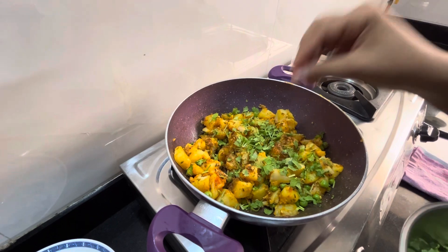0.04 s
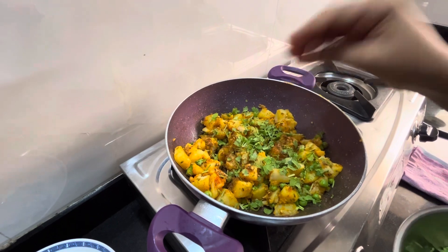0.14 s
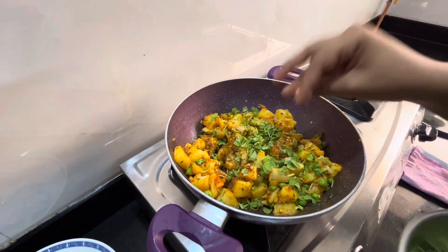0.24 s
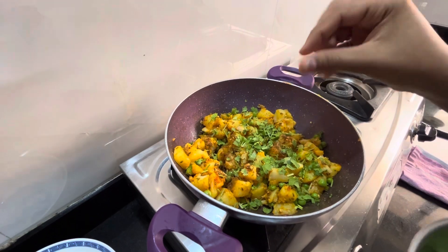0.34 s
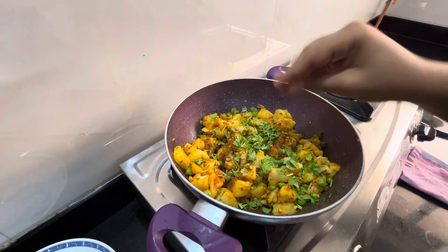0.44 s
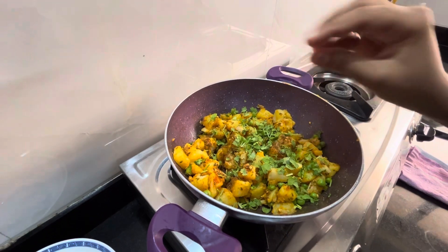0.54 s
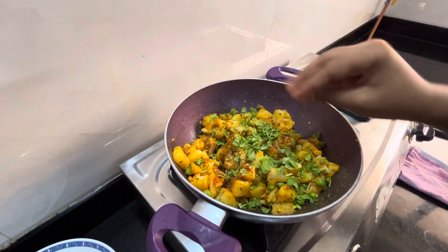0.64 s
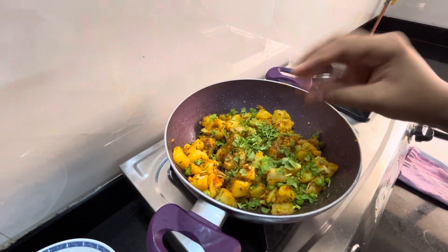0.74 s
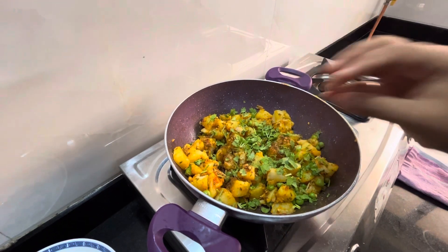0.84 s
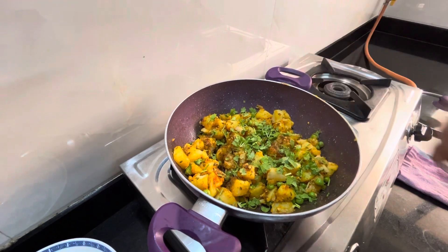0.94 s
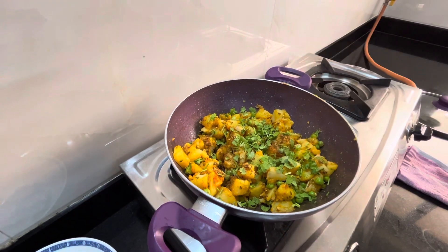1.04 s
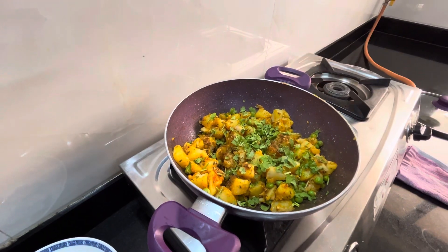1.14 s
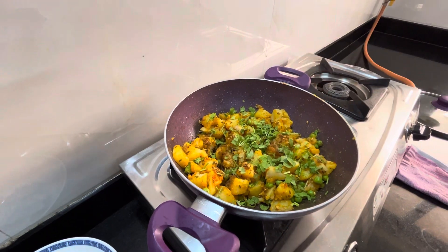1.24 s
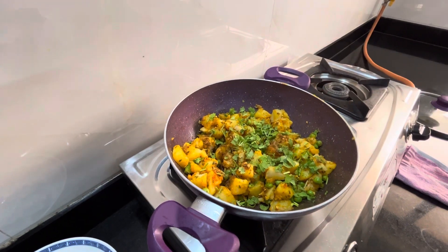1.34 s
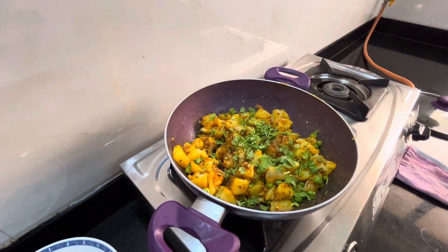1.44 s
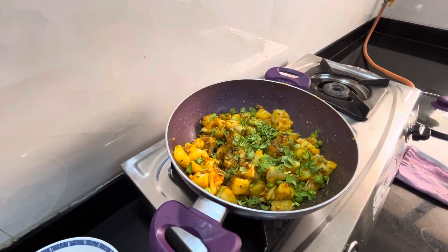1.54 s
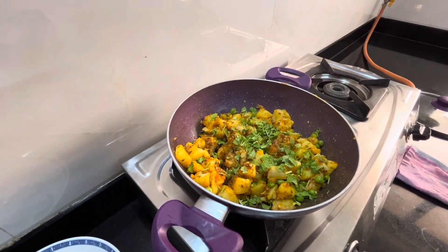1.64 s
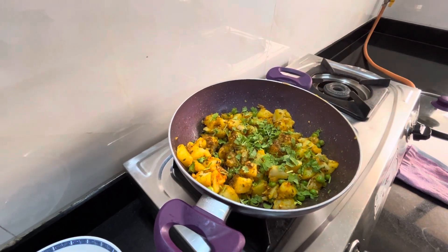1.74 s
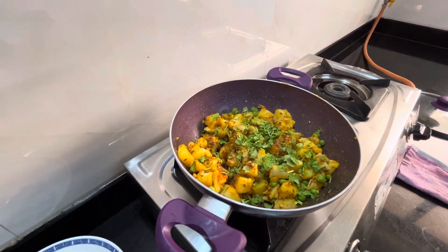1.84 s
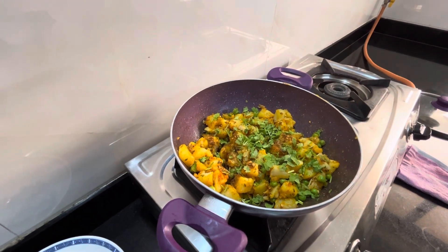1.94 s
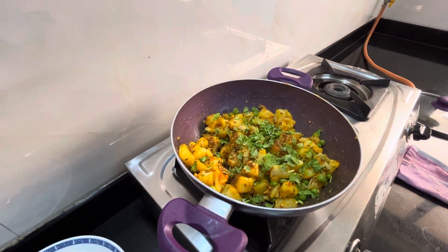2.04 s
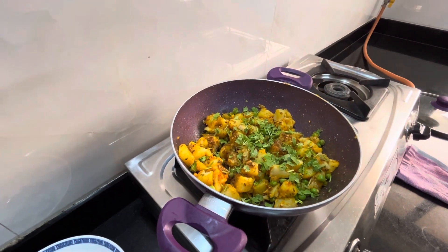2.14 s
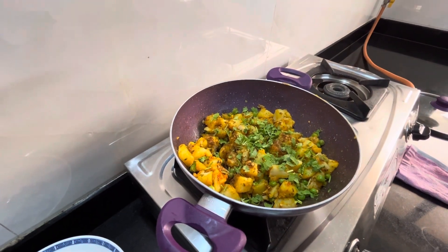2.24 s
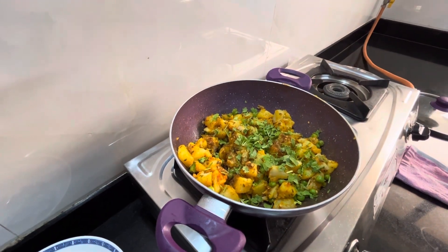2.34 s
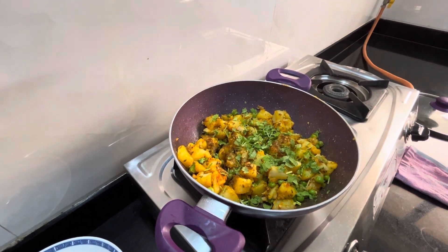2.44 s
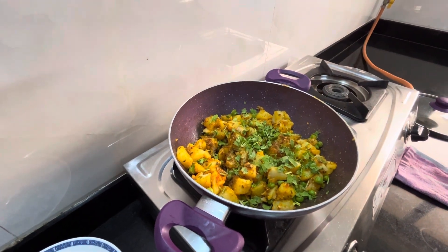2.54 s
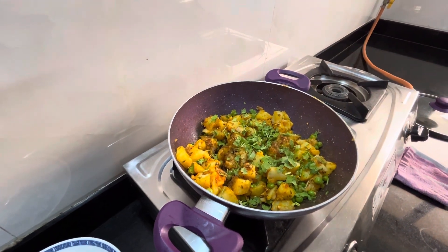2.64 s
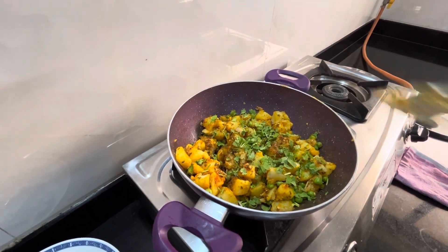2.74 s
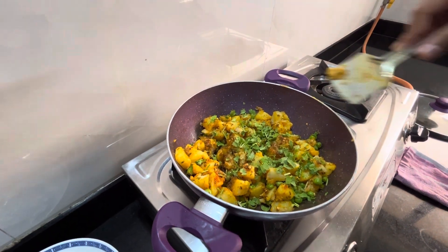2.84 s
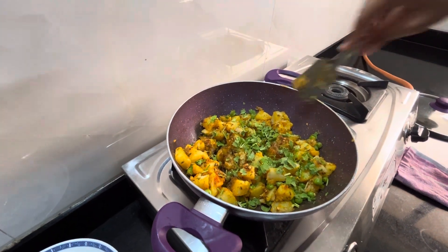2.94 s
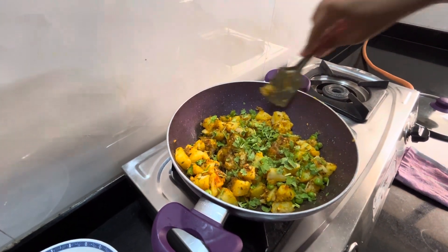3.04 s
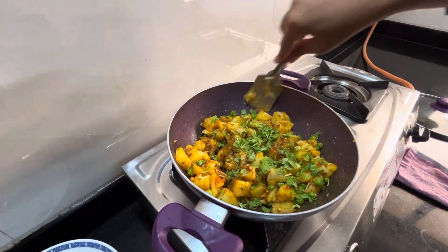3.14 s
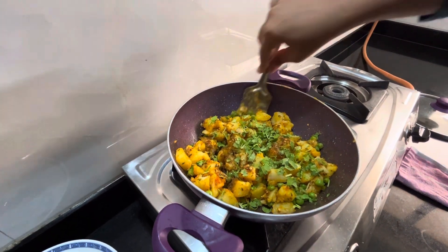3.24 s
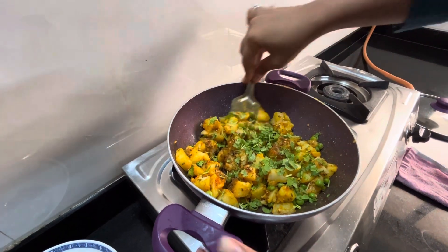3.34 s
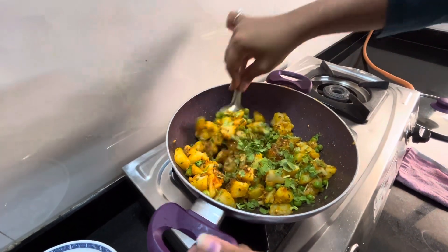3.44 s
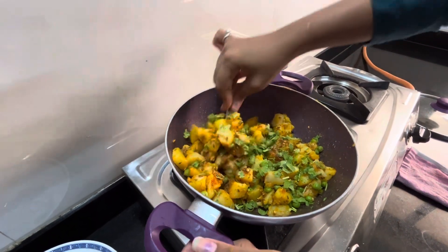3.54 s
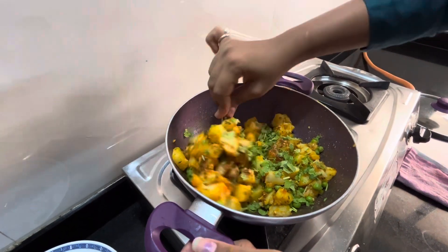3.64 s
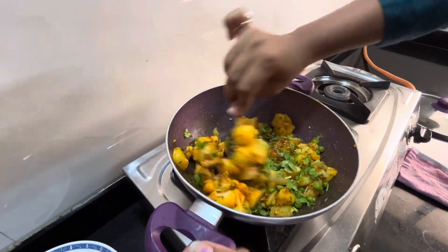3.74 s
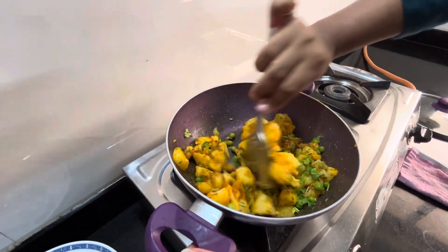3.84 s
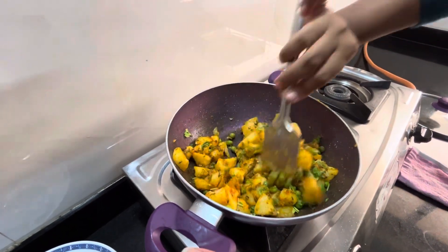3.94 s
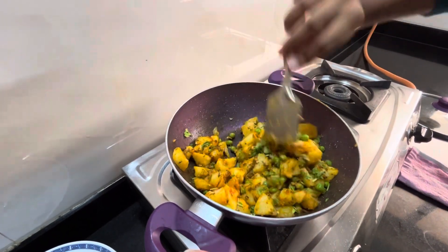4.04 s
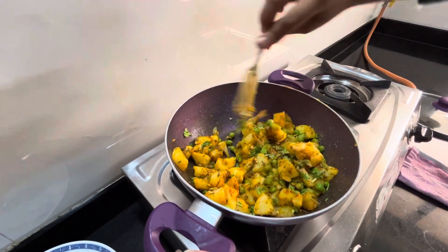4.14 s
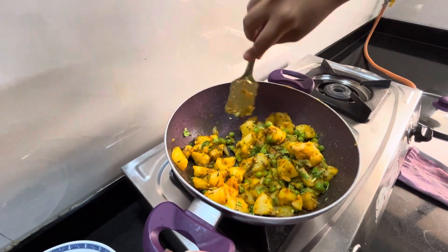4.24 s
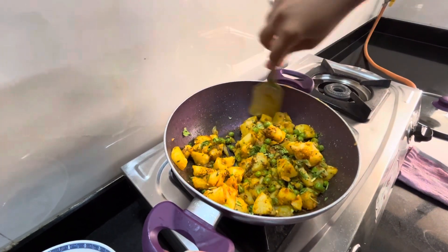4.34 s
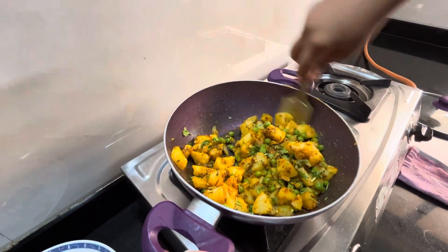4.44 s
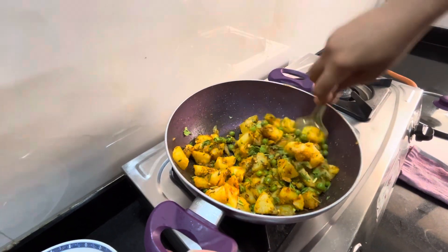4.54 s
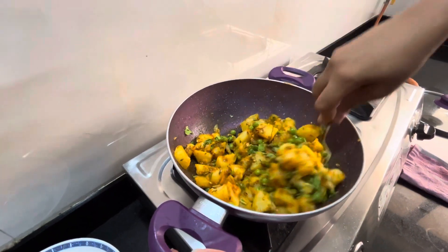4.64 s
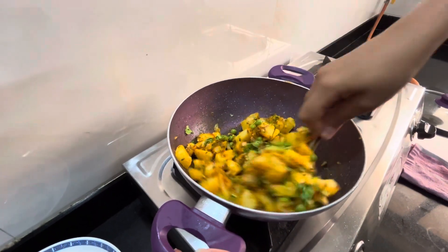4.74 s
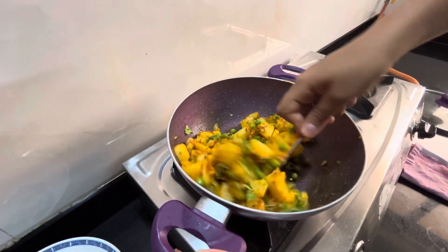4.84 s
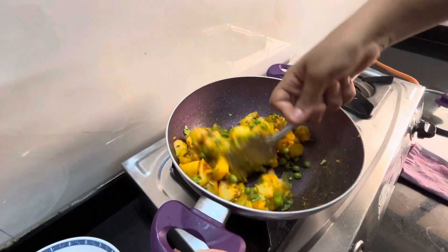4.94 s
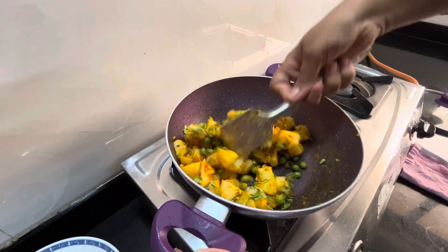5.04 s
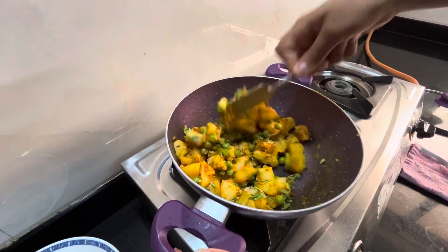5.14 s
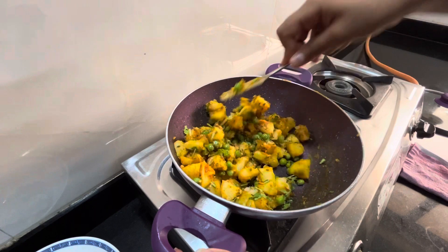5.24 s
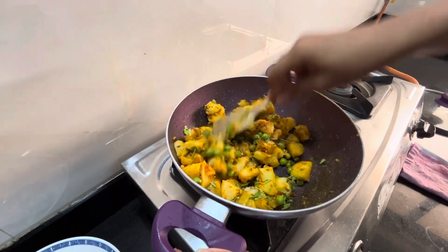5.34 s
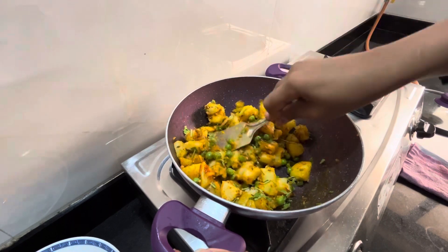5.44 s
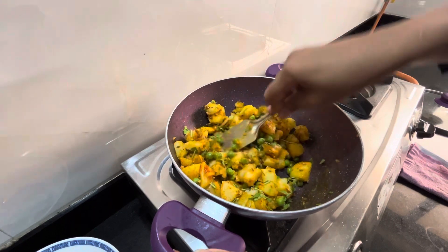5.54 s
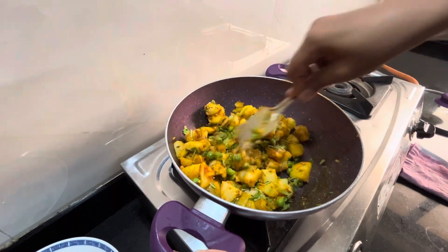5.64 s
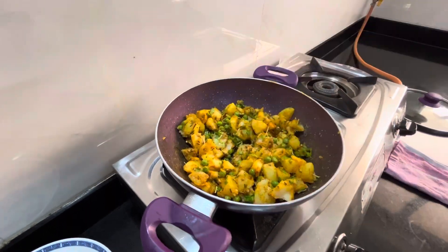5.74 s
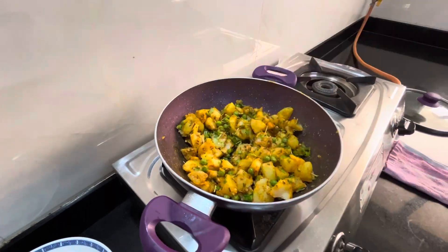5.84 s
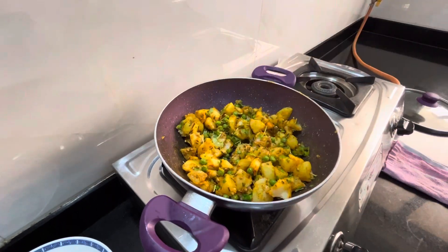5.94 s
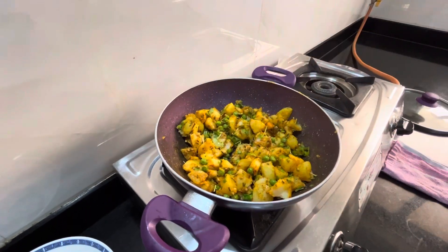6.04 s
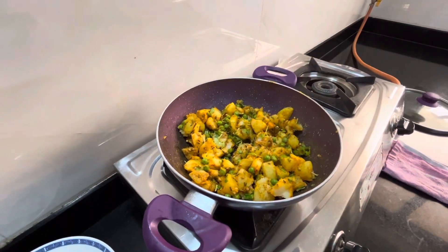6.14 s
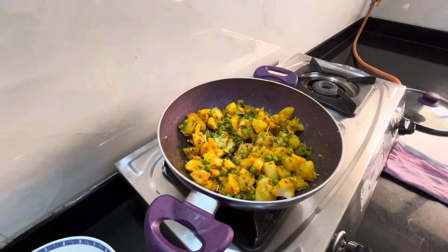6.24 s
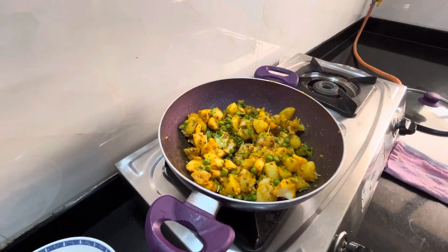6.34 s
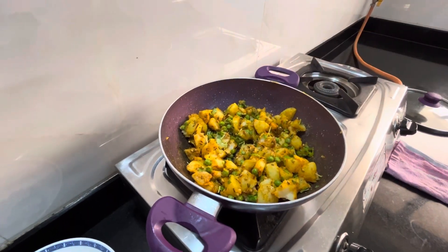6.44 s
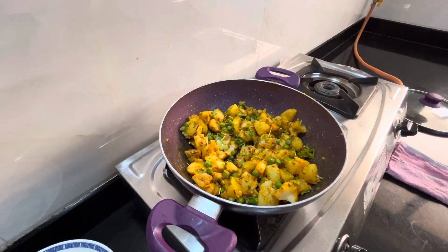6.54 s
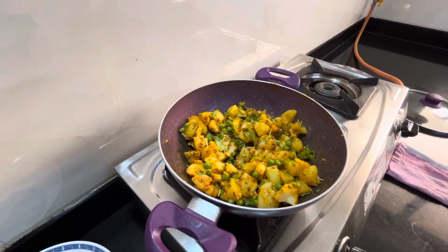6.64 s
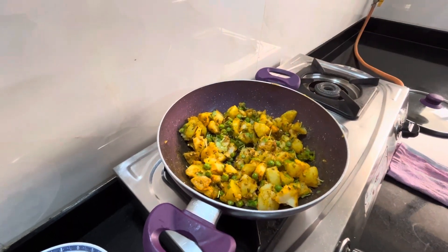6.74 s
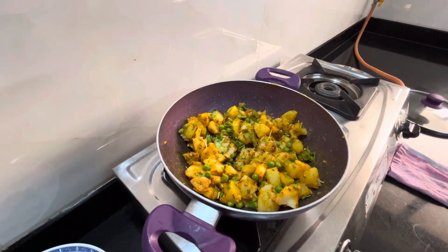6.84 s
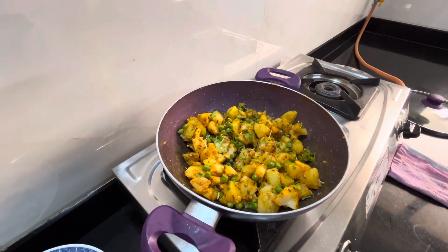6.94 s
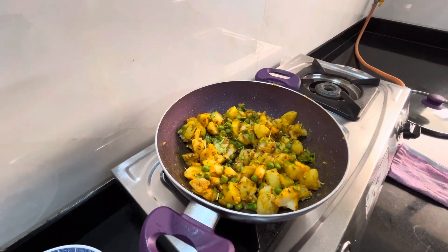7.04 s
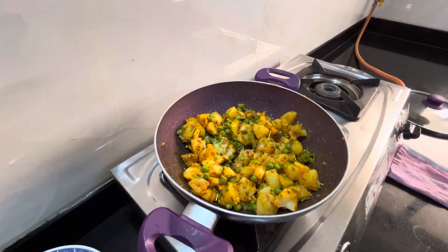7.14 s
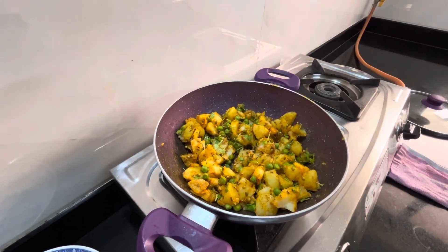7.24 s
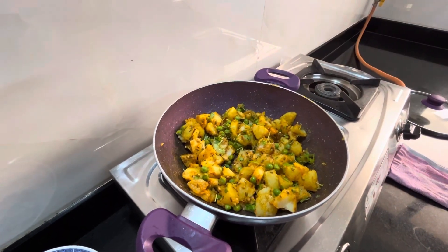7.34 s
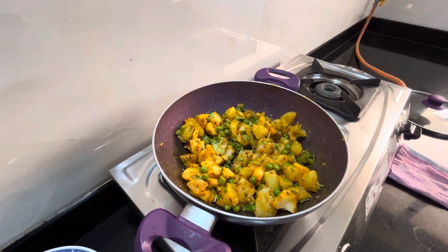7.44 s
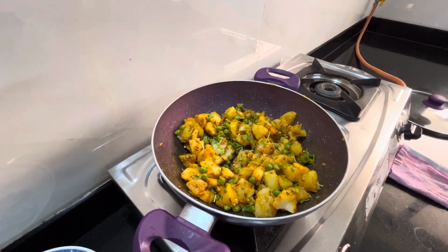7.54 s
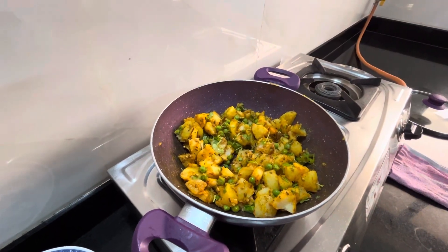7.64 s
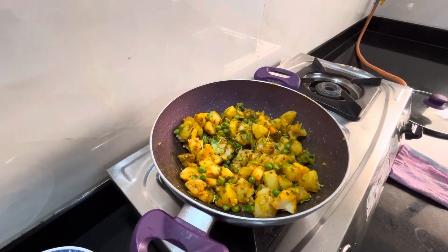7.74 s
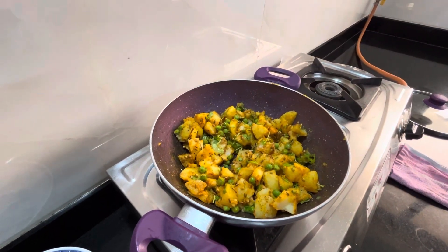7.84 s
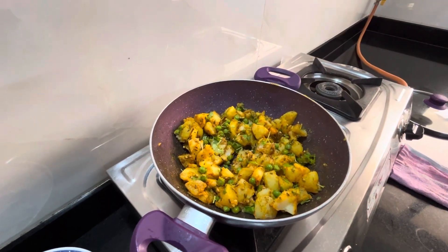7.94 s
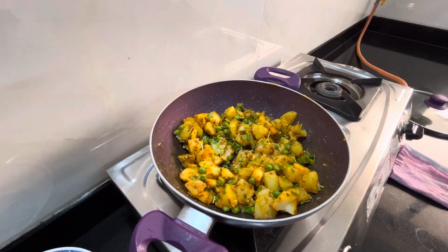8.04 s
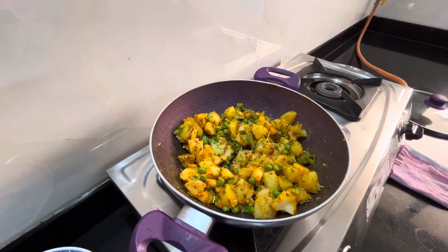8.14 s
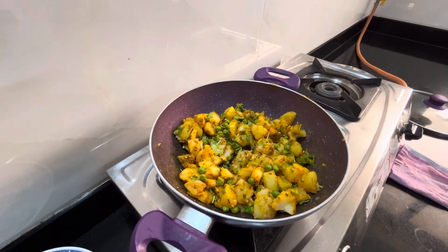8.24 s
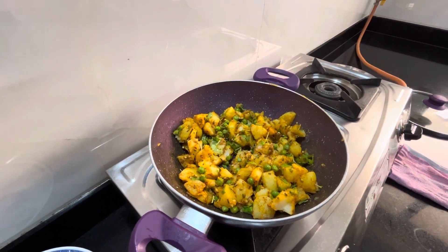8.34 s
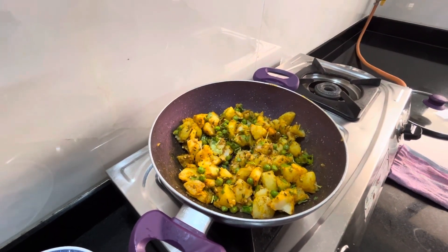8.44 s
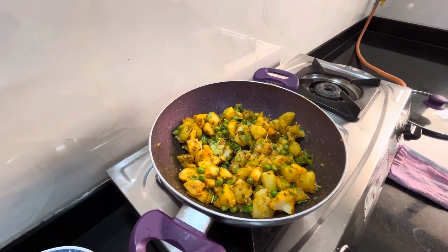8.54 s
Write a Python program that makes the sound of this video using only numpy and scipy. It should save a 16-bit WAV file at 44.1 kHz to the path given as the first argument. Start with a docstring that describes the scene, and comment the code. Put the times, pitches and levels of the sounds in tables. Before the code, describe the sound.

A small, hard, lively kitchen heard closely in stereo: a low steady room drone, faint wavering hum and a soft crackling sizzle that slowly fades throughout. The first second is only this background. A faint knock comes at 1.3 s, light utensil rubs at 1.65 and 1.95, then a cluster of dull thuds and short damped dish clinks from 2.15 to 2.65 with low handling rumble. At 2.95 a hard spatula tap hits the pan, followed by gritty scrapes and wet squelches until about 3.5. A lull, then another sharp tap at 4.3, with scraping, squeaky rubs and squelching to 4.75, and heavy dull knocks around 4.9-5.2. A tiny tick at 5.7 and small handling clicks at 6.3 precede the loudest event: at 6.74 a bright steel clank, rapidly bouncing, ringing for about half a second. The background ducks, then returns, with faint rumble and soft bumps at 7.6-7.9.

```python
"""Small hard-walled kitchen: a steel spatula turns cooked potato filling in a nonstick pan on a gas stove.
Knocks are noise bursts through resonances; taps, clinks and the put-down clank add decaying modes.
Scrapes are random slips exciting the pan's modes, squelches are crowds of bursting wet films.
Shaped noise gives a low drone, hum, slowly fading sizzle and spells of rumble; gain ducks under loud blows."""
import sys
import numpy as np
from scipy import signal
from scipy.fft import rfft, irfft, next_fast_len
from scipy.io import wavfile
from scipy.ndimage import uniform_filter1d, minimum_filter1d

SR = 44100
rng = np.random.default_rng(int(sys.argv[2]) if len(sys.argv) > 2 else 0)


def unload_wav(signal):
    """Save mono or channel-first audio to the path in sys.argv[1] as 16-bit WAV at rate SR, clipped to [-1, 1]."""
    wavfile.write(
        sys.argv[1],
        SR,
        np.round(np.clip(np.atleast_2d(signal).T, -1, 1) * 32767).astype(np.int16),
    )


N = 378267
TIME_S = np.arange(N) / SR
RING_S = TIME_S[:SR]  # one second, time since a blow
TOP_HZ = 15800

# Levels are relative: each source adds its own gain, room and ducking.
# Kitchen decay: (frequency [Hz], t60 [s])
ROOM_DECAY = [(150, 0.79), (500, 0.61), (1500, 0.51), (4000, 0.5), (8000, 0.52), (14000, 0.16)]
# Room drone spectrum: (frequency [Hz], level [dB])
DRONE_SPECTRUM = [(20, -31), (28, -34), (39, -23), (50, -0.5), (62, -18.5), (85, 2), (108, 1.5),
                  (155, -7.5), (225, -11), (300, -11.5), (400, -7.5), (480, -26), (1000, -24),
                  (1800, -40.5)]
# Sizzle spectrum: (frequency [Hz], level [dB])
SIZZLE_SPECTRUM = [(80, 3), (350, -1.5), (600, -3), (1180, -2), (1740, -6), (2280, -7), (2540, -9),
                   (3600, -5.5), (6690, -12), (7860, -15.5), (10400, -8.5), (13300, -18.5), (14200, -7),
                   (15000, -59)]
# Hum bands: (centre [Hz], level [dB], filter width [Hz])
HUM_BANDS = [(103.6, -87, 17), (378.5, -59.5, 4.4), (425, -68.5, 5.7)]
# Dull knocks of dishes, pan and food:
# (time [s], level [dB], body pitch [Hz], body filter width [Hz], tick [dB], left minus right [dB])
KNOCK_EVENTS = [(1.311, -21.5, 330, 567, -13, 5), (2.154, -9.5, 547, 407, -11.5, -5),
                (2.156, -6, 828, 150, -8, 6), (2.205, -16, 890, 298, -30, 6),
                (2.371, -14.5, 510, 610, -5.5, -1), (2.479, -16, 925, 810, -4.5, 7),
                (2.49, -11, 470, 702, -14, -3), (2.496, -11.5, 105, 68.6, -32, 1),
                (2.633, -13.5, 88, 39, -13, 2), (2.972, -3, 489, 700, -33, 0),
                (3.039, -8.5, 328, 500, -30, -1), (3.159, -16, 194, 70, -28.5, 0),
                (3.587, -15.5, 850, 140, -30, 4), (4.289, -11, 370, 584, -29.5, -3),
                (4.913, -11.5, 910, 268, -42, 0.5), (4.9905, -17.5, 1070, 1130, -28, 0),
                (4.993, -4.5, 315, 129, -30, -3), (5.008, -7.5, 580, 317, -25, 7.5),
                (5.194, -16, 134, 99, -33, 0), (6.342, -22, 1000, 1800, -8.5, 9),
                (6.358, -15, 161, 283, -30, 5), (7.661, -30.5, 1250, 1500, -24, 7),
                (7.897, -23.5, 990, 202, -25, 2)]
# Short rubs and squeaks of utensils:
# (peak time [s], half length [s], level [dB], centre [Hz], filter width [Hz])
RUB_EVENTS = [(1.653, 0.045, -45.5, 3980, 3000), (1.658, 0.037, -47, 1870, 500),
              (1.66, 0.024, -47, 3230, 250), (1.68, 0.018, -48, 5700, 300), (1.682, 0.019, -39, 4340, 200),
              (1.67, 0.035, -54, 7450, 250), (1.679, 0.04, -51, 8800, 250), (1.933, 0.024, -45, 3080, 900),
              (1.959, 0.025, -44.5, 3020, 200), (1.961, 0.026, -46.5, 5730, 4000),
              (1.958, 0.015, -46, 2430, 199), (2.462, 0.074, -43, 9500, 3000),
              (3.438, 0.025, -45, 1250, 202), (3.515, 0.032, -42, 4380, 400), (3.47, 0.017, -38, 1560, 298),
              (3.503, 0.045, -40, 1620, 300), (4.421, 0.05, -41, 3000, 350), (4.56, 0.06, -37, 3580, 250),
              (4.562, 0.07, -38, 1430, 300), (4.58, 0.016, -36, 850, 111), (4.623, 0.1, -39.5, 2800, 250),
              (4.658, 0.059, -37, 1680, 220), (4.636, 0.021, -39, 3300, 2200),
              (4.754, 0.049, -44, 2730, 220), (4.75, 0.05, -43.5, 1640, 400),
              (6.292, 0.018, -50.5, 4400, 1600), (6.312, 0.016, -50, 9000, 4000),
              (6.365, 0.025, -42, 1300, 1600), (6.37, 0.047, -51, 3750, 400)]
# Low rumble while things are handled: (hold start [s], hold [s], level [dB], deep boom [dB])
RUMBLE_SPELLS = [(2.15, 0.67, -49, -75), (3.233, 1.86, -52.5, -72), (6.095, 0.059, -53, -75),
                 (7.554, 0.43, -49.5, -55.5)]
# Handling rumble spectrum: (frequency [Hz], level [dB])
HANDLING_SPECTRUM = [(30, -25), (70, -14), (110, 4), (150, -8.5), (400, -19.5), (1500, -43.5)]
# Clinks of a moved dish: (time [s], level [dB], most strongly struck [Hz], left minus right [dB])
CLINK_EVENTS = [(2.352, -15, 1850, 11.5), (2.365, -14, 2860, 0), (2.4788, -10.5, 1900, 5.5),
                (6.344, -22.5, 2100, 8), (6.365, -23.5, 3740, 2)]
# Modes of the hand-damped dish: (frequency [Hz], level [dB], t60 [s])
DISH_MODES = [(900, 6.5, 0.026), (1560, 2.5, 0.036), (2050, 1, .022), (2320, -18, 0.013),
              (2485, -2.5, 0.048), (3370, -12, 0.031), (3820, -6, 0.033), (5300, -6, 0.033),
              (6500, -4, .015)]
# Blade pushed along the pan: (full-force time [s], hold [s], scrape [dB], wet squelch [dB])
BLADE_PUSHES = [(2.987, 0.13, -34, -51), (3.193, 0.22, -45.5, -51), (3.451, 0.048, -31.5, -45),
                (4.317, 0.44, -44, -46), (4.523, 0.071, -33.5, -43.5), (4.64, 0.088, -38, -57),
                (4.725, 0.039, -35.5, -68)]
# Lumps of filling giving way: (peak time [s], Gaussian half length [s], squelch [dB])
LUMP_SQUASHES = [(3.043, 0.033, -32.5), (3.181, 0.018, -37.5), (3.268, 0.012, -44.5), (3.397, 0.0095, -44),
                 (4.431, 0.031, -36.5)]
# Modes of the pan loaded with food: (frequency [Hz], level [dB], t60 [s])
PAN_MODES = [(492, 6.5, 0.017), (807, 1.5, 0.051), (1115, 9.5, 0.027), (1328, 7.5, 0.019),
             (1600, 3.5, 0.04), (2350, 1.5, 0.013), (2660, -1.5, 0.045), (3060, 8, 0.014),
             (3595, 5.5, 0.012), (4280, -5.5, 0.0098), (5200, -5, 0.029), (5360, 2.5, 0.022),
             (6400, 1, 0.033), (7000, -0.5, 0.041), (9500, -5, 0.025)]
# Scrape spectrum: (frequency [Hz], level [dB])
SCRAPE_SPECTRUM = [(40, -47), (200, 5.5), (450, -8), (800, 9), (1080, -2.5), (1500, 4.5), (2250, 3),
                   (2700, -2.5), (3500, -1), (4300, 7.5), (5400, -4), (7500, -5.5), (11000, -34),
                   (15000, -45)]
# Squelch spectrum: (frequency [Hz], level [dB])
SQUELCH_SPECTRUM = [(2500, -53), (5500, 10.5), (7300, 10.5), (10500, 14.5), (13000, 10.5), (15000, -64)]
# Blade meets pan: (time [s], level [dB], click centre [Hz], click filter width [Hz],
# pan ring [dB], left minus right [dB])
TAP_EVENTS = [(2.952, 0.5, 3260, 4450, 5, 2), (2.9533, -9, 6060, 1500, -8, 9),
              (2.973, -29, 2200, 1800, -17, 8), (3.024, -14, 9000, 7000, 2, -6),
              (3.033, -8, 8600, 7000, 0, 0), (3.044, -13, 7000, 7000, 2, 6), (3.1, -6, 10400, 7000, -7, 0),
              (3.129, -16.5, 10400, 6000, -6, 2), (3.265, -24.5, 6000, 5020, 2, 5),
              (3.278, -25, 6550, 4000, -4, 9), (4.287, 1.5, 11400, 2220, -8, 0.5),
              (4.2871, -1.5, 7330, 1100, -12, 4.5), (5.687, -29, 11100, 8000, -24, 1)]
# Spatula lands, bounces, settles: (time [s], level [dB], ring [dB])
CLANK_BOUNCES = [(6.7427, 15, 3.5), (6.7582, 4.5, 17.5), (6.779, -5, 22), (6.7855, 12, -13),
                 (6.807, 2.5, 5), (6.85, -2, 4), (6.93, -26, 22), (6.983, -26, 20)]
# Steel spatula modes, close pairs beat:
# (frequency [Hz], level [dB], t60 [s], share left ringing after contact [dB], left minus right [dB])
STEEL_MODES = [(2497, 5, .55, -34, 2), (2530, 0, .5, -33, 2), (2582, -6, .5, -32, 0),
               (3112, -8, .33, -28, 2), (3448, -11, .5, -26, -2), (3475, -10, .5, -24, 2),
               (3779, -2, .55, -18, 3), (3808, -2, .57, -12, 3), (4290, -15, .4, -28, 3),
               (5200, -1, .5, -22, 1), (5232, -1, .55, -17, 2), (5296, -10, .55, -18, 3),
               (5545, -14, .4, -26, 2), (6300, -14, .5, -22, 5), (6835, -1, .52, -22, 5),
               (6866, -4, .5, -26, 5), (6959, -8, .5, -26, 4), (7900, -13, .4, -22, 0),
               (8658, -4, .44, -24, -3), (9141, -11, .4, -26, -4), (9533, -5, .42, -25, -8),
               (10700, -10, .36, -26, -2), (11150, -7, .36, -26, -2), (11680, -13, .36, -26, 0),
               (12870, -11, .3, -22, 0), (13250, -11, .3, -24, 0)]

KNOCK_CYCLES = 40  # t60 in cycles, so low knocks last longer
DRONE_DB, SIZZLE_START_DB, SIZZLE_FALL_DB_PER_S = -52.5, -52.5, 0.61
RUMBLE_ATTACK_S, RUMBLE_RELEASE_S = 0.058, 0.11
PUSH_ATTACK_S, PUSH_RELEASE_S, PUSH_SAG_DB_PER_S = 0.07, 0.012, 30
SQUASH_SCRAPE_DB = -5  # blade grazes the pan as it breaks through
SLIPS_PER_S, SLIP_SPREAD_DB = 420, 3.2
FILMS_PER_S, FILM_SPREAD_DB = 650, 2.4  # wet films bursting
# Random swings: rms depth, random steps per s
TEAR_DB, TEAR_PER_S = 2.2, 45  # filling tears in fits
CONTACT_DB, CONTACT_PER_S = 4.2, 36  # each pan mode swells on its own
DRIFT_SHARE, DRIFT_PER_S = .028, 17  # shift of the pan's resonances
JUDDER_DB, JUDDER_PER_S = 0.1, 110
ROCK_DB, ROCK_PER_S = 2.5, 30  # mode flutter as the spatula rocks


def undb(db):
    """Decibels to gain."""
    return 10 ** (np.asarray(db) / 20)


def unit(x):
    """Scale each channel to rms 1."""
    return x / np.sqrt(np.mean(x ** 2, axis=-1, keepdims=True))


def blow(x):
    """Scale each channel of a response to energy 1."""
    return unit(x) / np.sqrt(x.shape[-1])


def fade(t60_s):
    """Exponential decay over one second."""
    return np.exp(-np.log(1000) * RING_S / max(t60_s, 1e-4))


def left_right(difference_db):
    """Left and right gains."""
    return undb(np.array([[difference_db], [-difference_db]]) / 2)


def band(x, hz, width_hz):
    """Two-pole resonance."""
    hz = min(hz, SR * .45)
    g, k = np.tan(np.pi * hz / SR), width_hz / hz
    feedback = [1 + g * k + g * g, 2 * g * g - 2, 1 - g * k + g * g]
    return signal.lfilter([g * k, 0, -g * k], feedback, x + 1e-18)


def colour(x, points):
    """Shape a sound with a (Hz, dB) spectrum; rms 1."""
    size = next_fast_len(N)
    hz, db = np.transpose(points)
    bins_hz = np.arange(size // 2 + 1) * SR / size
    gain = undb(np.interp(np.log(bins_hz + 1), np.log(hz), db))
    return unit(irfft(rfft(x, size) * gain, size)[..., :N])


def stereo_noise(correlation):
    """Two noises with a given correlation."""
    mid, side = rng.standard_normal((2, N))
    c = np.clip(correlation, 0, 1)
    return np.sqrt(1 + c) * mid + np.sqrt(1 - c) * side * np.array([[1], [-1]])


def burst(t60_s):
    """Crowded decaying vibrations, different at each microphone."""
    return rng.standard_normal((2, SR)) * fade(t60_s)


def ring(modes):
    """Decaying modes; each reaches the two microphones with its own phase."""
    phases = rng.uniform(0, 2 * np.pi, (len(modes), 2, 1))
    total = 0
    for (hz, db, t60_s), phase in zip(modes, phases):
        sine = np.sin(2 * np.pi * hz * RING_S + phase)
        total = total + undb(db) * blow(sine * fade(t60_s))
    return blow(total)


def clicks(per_s, spread_db):
    """Random clicks of unequal size; rms 1."""
    fires = rng.random(N) < per_s / SR
    signs = rng.choice([-1, 1], N)
    return unit(fires * signs * undb(spread_db * np.minimum(rng.exponential(size=N), 4)))


def wander(per_s, size=N):
    """Smoothed random steps; rms 1."""
    hold = int(SR / per_s)
    steps = np.repeat(rng.standard_normal(size // hold + 1), hold)
    return unit(uniform_filter1d(uniform_filter1d(steps, hold), hold)[:size])


def through(x, response):
    """Pass a sound through a two-channel response."""
    return signal.oaconvolve(np.atleast_2d(x), response, axes=1)[:, :N]


def heard(x, room):
    """A blow with its reflections, at energy 1 in each microphone."""
    return blow(signal.fftconvolve(x, room, axes=1)[:, :SR])


def nearer(room, direct_db):
    """Room response with extra direct sound, for a close source."""
    return room + undb(direct_db) * (RING_S == 0)


def add(out, time_s, x):
    """Mix a sound in at a time."""
    i = int(time_s * SR)
    out[:, i:i + x.shape[1]] += x[:, :N - i]


def gesture(start_s, hold_s, attack_s, release_s):
    """Smooth rise ending at the start, a hold, then an exponential release."""
    rise = np.clip((TIME_S - start_s) / attack_s + 1, 0, 1)
    return rise ** 2 * np.exp(-np.maximum(TIME_S - start_s - hold_s, 0) / release_s)


def kitchen(early_db=-7, early_t60_s=0.17, late_db=-6, gap_s=0.0066, build_s=0.0011):
    """Direct sound, quick reflections from stove and wall, and a tail whose decay varies with frequency."""
    hz, t60_s = np.transpose(ROOM_DECAY)
    noise = rfft(rng.standard_normal((2, SR)))
    # one-second noise: bin number is Hz; neighbouring bands crossfade
    place = np.interp(np.log(np.arange(noise.shape[1]) + 1), np.log(hz), np.arange(len(hz)))
    late = 0
    for k, band_t60_s in enumerate(t60_s):
        late = late + irfft(noise * np.maximum(1 - abs(place - k), 0), SR) * fade(band_t60_s)
    arrival = np.clip((RING_S - gap_s) / build_s, 0, 1)
    early = undb(early_db) * blow(arrival * burst(early_t60_s))
    return (RING_S == 0) + early + undb(late_db) * blow(arrival * late)


def drone():
    """Steady room drone: nearly mono noise, mostly low."""
    return undb(DRONE_DB) * colour(stereo_noise(0.99), DRONE_SPECTRUM)


def sizzle(crackle_db=-10):
    """Hot pan: wide hiss and random crackles, slowly dying down."""
    crackle = unit(through(clicks(260, 3.2), burst(.003)))
    hiss = unit(stereo_noise(0.024))
    level = undb(SIZZLE_START_DB - SIZZLE_FALL_DB_PER_S * TIME_S)
    return level * colour(hiss + undb(crackle_db) * crackle, SIZZLE_SPECTRUM)


def hum():
    """Narrow noise bands, heard as wavering tones."""
    out = 0
    for hz, db, width_hz in HUM_BANDS:
        tone = band(band(stereo_noise(0.2), hz, width_hz), hz, width_hz)
        out = out + undb(db) * unit(tone)
    return out


def knocks(room, tick_t60_s=0.05, tick_hz=9800, tick_width_hz=2200,
           crunch_db=-1, crunch_hz=3500, crunch_width_hz=9000, gain_db=4.5):
    """Each knock is a tick of contact and a short resonant thud of the body behind it."""
    out = np.zeros((2, N))
    for time_s, db, hz, width_hz, tick_db, side_db in KNOCK_EVENTS:
        thud = band(band(burst(KNOCK_CYCLES / hz), hz, width_hz), hz, 2 * width_hz)
        body = heard(thud, room)
        # long waves reach both microphones alike
        body = blow(body + body[::-1] / (1 + (hz / 300) ** 2))
        contact = burst(tick_t60_s)
        crunch = blow(band(contact, crunch_hz, crunch_width_hz))
        tick = blow(band(contact, tick_hz, tick_width_hz)) + undb(crunch_db) * crunch
        knock = body + undb(tick_db) * heard(tick, room)
        add(out, time_s, undb(db + gain_db) * left_right(side_db) * knock)
    return out


def rubs(room, grit_clicks_per_s=700, steel_clicks_per_s=2000, steel_db=-13, side_db=4.0,
         held=0.044, direct_db=-4):
    """Gritty slides swell and stop: one resonance sings over steel whose decay the hand shortens."""
    out = np.zeros((2, N))
    close = nearer(room, direct_db)
    grit = through(clicks(grit_clicks_per_s, 0.96), blow(burst(0.0011)))
    damped_modes = [(hz, db / 2, held * t60_s) for hz, db, t60_s, _, _ in STEEL_MODES]
    steel = through(clicks(steel_clicks_per_s, 1.1), ring(damped_modes))
    for time_s, half_s, db, hz, width_hz in RUB_EVENTS:
        start, size = int((time_s - half_s) * SR), int(2 * half_s * SR)
        song = unit(band(band(grit[:, start:start + size], hz, width_hz), hz, width_hz))
        slide = song + undb(steel_db) * unit(steel[:, start:start + size])
        slide = slide * np.hanning(size) ** 2
        strength = np.linalg.norm(slide, axis=1, keepdims=True)
        add(out, time_s - half_s, undb(db) * left_right(side_db) * strength * heard(slide, close))
    return out


def handling_rumble(boom_hz=40, boom_width_hz=18):
    """Handling: spells of low noise with a deep narrow-band boom."""
    rumble = colour(stereo_noise(0.95), HANDLING_SPECTRUM)
    boom = unit(band(band(stereo_noise(.98), boom_hz, boom_width_hz), boom_hz, boom_width_hz))
    out = 0
    for start_s, hold_s, db, boom_db in RUMBLE_SPELLS:
        spell = gesture(start_s, hold_s, RUMBLE_ATTACK_S, RUMBLE_RELEASE_S)
        out = out + spell * (undb(db) * rumble + undb(boom_db) * boom)
    return out


def clinks(room, fall_db_per_octave=9, direct_db=-8, gain_db=6.5):
    """Each clink favours dish modes near one pitch, set by where the dish is touched."""
    out = np.zeros((2, N))
    close = nearer(room, direct_db)
    for time_s, db, struck_hz, side_db in CLINK_EVENTS:
        modes = [(hz, mode_db - fall_db_per_octave * abs(np.log2(hz / struck_hz)), t60_s)
                 for hz, mode_db, t60_s in DISH_MODES]
        add(out, time_s, undb(db + gain_db) * left_right(side_db) * heard(ring(modes), close))
    return out


def effort():
    """Force on pan and food: each push eases off as it goes, each squashed lump swells and stops."""
    pressure, wetness = np.zeros((2, N))
    for start_s, hold_s, scrape_db, wet_db in BLADE_PUSHES:
        sag = undb(-PUSH_SAG_DB_PER_S * np.maximum(TIME_S - start_s, 0))
        push = gesture(start_s, hold_s, PUSH_ATTACK_S, PUSH_RELEASE_S) * sag
        pressure = np.maximum(pressure, undb(scrape_db) * push)
        wetness = np.maximum(wetness, undb(wet_db) * push)
    squash = sum(undb(db) * np.exp(-((TIME_S - s) / half_s) ** 2) for s, half_s, db in LUMP_SQUASHES)
    return np.hypot(pressure, undb(SQUASH_SCRAPE_DB) * squash), np.hypot(wetness, squash)


def scraping(grit_db=-4):
    """Stick-slip clicks drive the pan's modes and grit; the hand evens the force, the blade judders."""
    slips = clicks(SLIPS_PER_S, SLIP_SPREAD_DB)
    body = 0
    for hz, db, t60_s in PAN_MODES:
        # the contact point travels: each mode swells and fades on its own
        swell = undb(db + CONTACT_DB * wander(CONTACT_PER_S))
        body = body + swell * through(slips, ring([(hz, db, t60_s)])[:, :SR // 10])
    grit = unit(through(slips, burst(0.013)))
    scrape = colour(unit(body) + undb(grit_db) * grit, SCRAPE_SPECTRUM)
    # uneven reading speed: resonances shift as the food moves
    shifted = np.arange(N) + np.cumsum(DRIFT_SHARE * wander(DRIFT_PER_S))
    scrape = np.array([np.interp(shifted, np.arange(N), channel) for channel in scrape])
    force = np.sqrt(uniform_filter1d(np.mean(scrape ** 2, axis=0), size=1500))
    return scrape / force * undb(JUDDER_DB * wander(JUDDER_PER_S))


def squelching():
    """Tiny wet films burst in the food, in fits as it tears."""
    films = through(clicks(FILMS_PER_S, FILM_SPREAD_DB), burst(0.0098))
    return colour(films, SQUELCH_SPECTRUM) * undb(TEAR_DB * wander(TEAR_PER_S))


def stirring(room, scrape_db=-2, squelch_db=-1, side_db=2.5):
    """Force on the pan drives the scraping, force on the food the squelching."""
    pressure, wetness = effort()
    scrape = undb(scrape_db) * left_right(side_db) * pressure * scraping()
    return through(scrape + undb(squelch_db) * wetness * squelching(), room)


def taps(room, click_t60_s=0.038, direct_db=-2, gain_db=4.0):
    """The blade edge clicks close by and rings the pan, which the food damps quickly."""
    out = np.zeros((2, N))
    close = nearer(room, direct_db)
    for time_s, db, hz, width_hz, ring_db, side_db in TAP_EVENTS:
        click = heard(band(burst(click_t60_s), hz, width_hz), close)
        tap = click + undb(ring_db) * heard(ring(PAN_MODES), room)
        add(out, time_s, undb(db + gain_db) * left_right(side_db) * tap)
    return out


def clank(room, crack_t60_s=0.027, crack_hz=4800, crack_width_hz=7500, out_side_db=2.0,
          tilt_db_per_octave=-1, contact_t60_s=0.051, thud_db=-11, thud_hz=1200, thud_width_hz=1100,
          thud_t60_s=0.27, direct_db=0, bite_s=0.0014):
    """Steel lands on steel: bounces crack, thud and ring the spatula, whose rocking flutters each mode."""
    out, struck = np.zeros((2, N)), np.zeros(SR)
    landing_s = CLANK_BOUNCES[0][0]
    close = nearer(room, direct_db)
    bite = 1 - np.exp(-RING_S / bite_s)  # contact takes a moment to build
    for time_s, db, ring_db in CLANK_BOUNCES:
        crack = band(bite * burst(crack_t60_s), crack_hz, crack_width_hz)
        crack = band(crack, crack_hz, 3 * crack_width_hz)
        thud = band(band(burst(thud_t60_s), thud_hz, thud_width_hz), thud_hz, 2 * thud_width_hz)
        add(out, time_s, undb(db) * (heard(crack, close) + undb(thud_db) * heard(thud, room)))
        struck[int((time_s - landing_s) * SR)] += undb(db + ring_db) ** 2
    # contact drains most of each bounce's energy; the rest rings on freely
    damped = np.abs(signal.fftconvolve(struck, fade(contact_t60_s) ** 2)[:SR])
    free = np.cumsum(struck)
    tone = 0
    for hz, db, t60_s, free_db, side_db in STEEL_MODES:
        swing = np.sqrt(damped + undb(free_db) ** 2 * free) * undb(ROCK_DB * wander(ROCK_PER_S, size=SR))
        level = undb(db + tilt_db_per_octave * np.log2(hz / crack_hz))
        tone = tone + level * left_right(side_db) * heard(ring([(hz, db, t60_s)]) * swing, room)
    add(out, landing_s, np.sqrt(damped.max()) * blow(tone))
    return left_right(out_side_db) * out


def scene():
    """All handling sounds in the kitchen, over its background."""
    room = blow(kitchen())
    background = drone() + sizzle() + hum() + handling_rumble()
    utensils = knocks(room) + rubs(room) + clinks(room)
    return background + utensils + stirring(room) + taps(room) + clank(room)


def gain_control(x, threshold_db=-21, ratio=3.07, hold_s=0.097, recover_db_per_s=70):
    """Loud blows turn the gain down at once; it holds for a moment, then comes back."""
    power = uniform_filter1d(np.mean(x ** 2, axis=0), size=440)
    db = 10 * np.log10(np.abs(power) + 1e-12)
    span = int(hold_s * SR)
    peak_db = -minimum_filter1d(-db, span, origin=(span - 1) // 2)
    recovery_db = recover_db_per_s * TIME_S
    held_db = np.maximum.accumulate(peak_db + recovery_db) - recovery_db
    return x * undb(-np.maximum(held_db - threshold_db, 0) * (1 - 1 / ratio))


def record(dry, rolloff_hz=13000, low_cut_hz=31):
    """Phone microphones lose deepest bass and highest treble, gain ducks under loud blows, the top is cut."""
    edges_hz = [low_cut_hz, min(rolloff_hz, TOP_HZ)]
    microphones = signal.butter(4, edges_hz, "bandpass", fs=SR, output="sos")
    ducked = gain_control(signal.sosfilt(microphones, dry))
    return signal.sosfilt(signal.ellip(8, .2, 70, TOP_HZ, fs=SR, output="sos"), ducked)


dry = scene()
out = record(dry)
unload_wav(out)
```